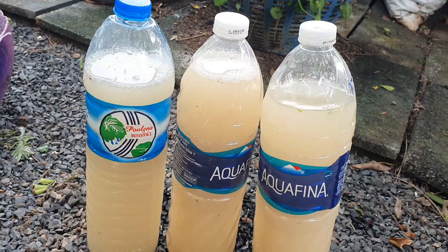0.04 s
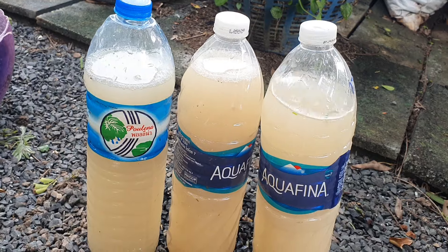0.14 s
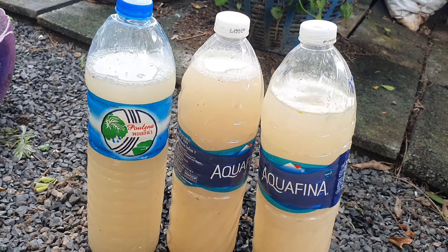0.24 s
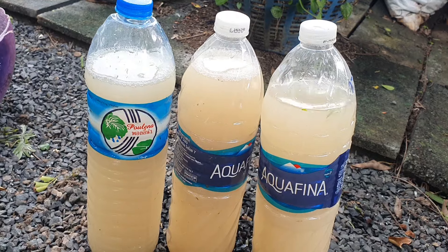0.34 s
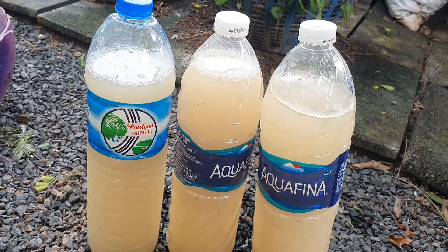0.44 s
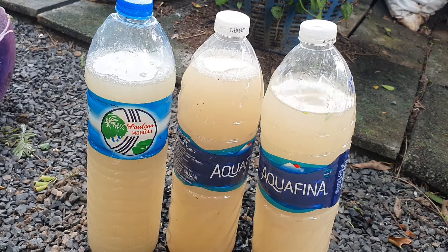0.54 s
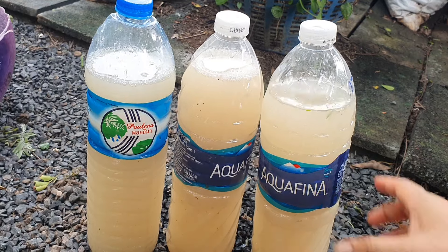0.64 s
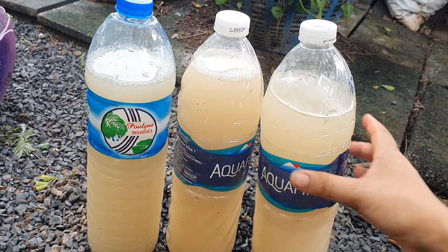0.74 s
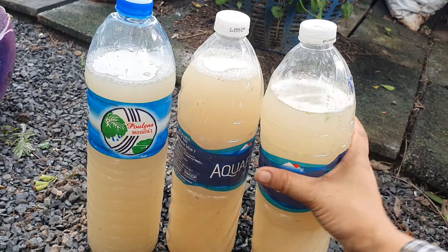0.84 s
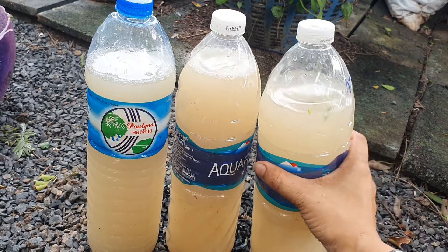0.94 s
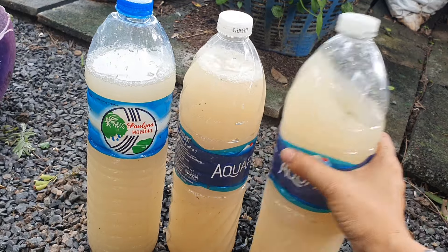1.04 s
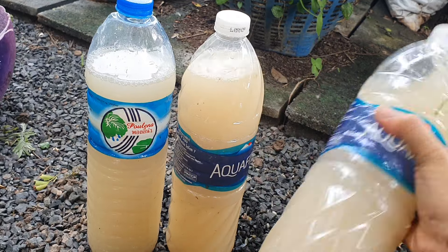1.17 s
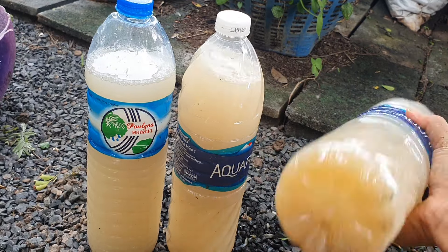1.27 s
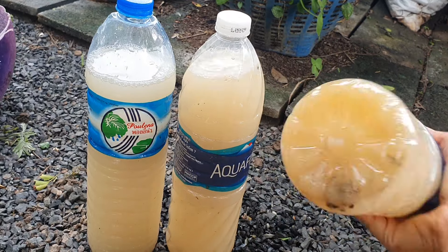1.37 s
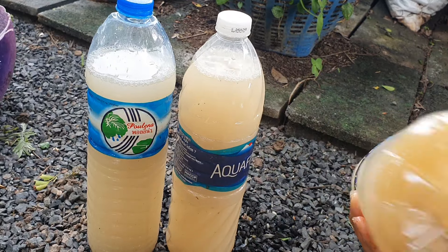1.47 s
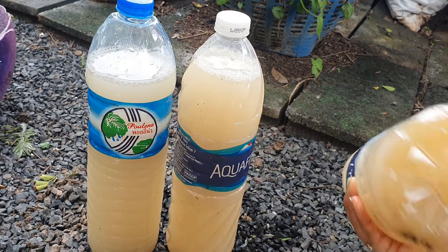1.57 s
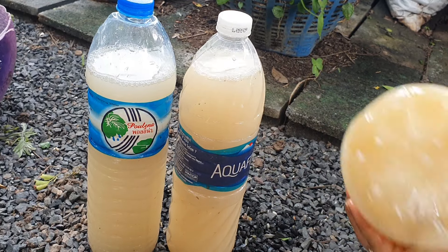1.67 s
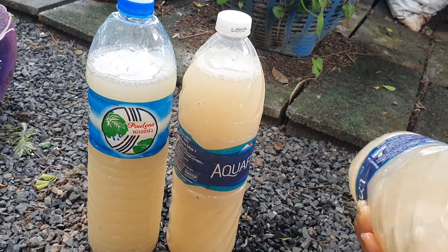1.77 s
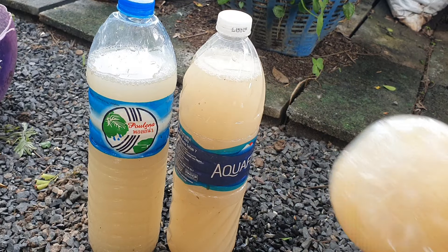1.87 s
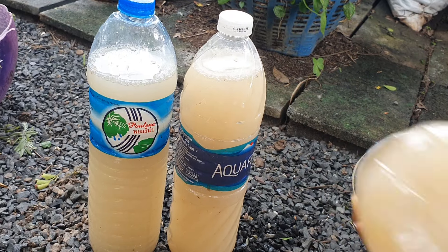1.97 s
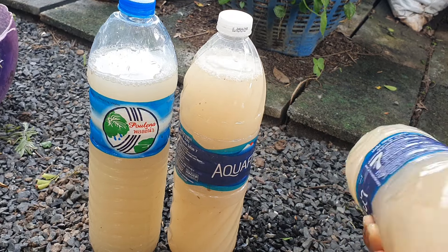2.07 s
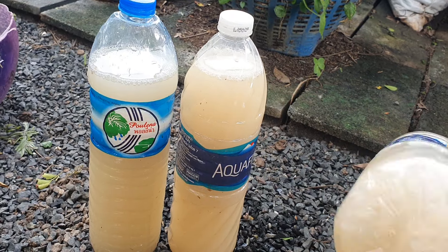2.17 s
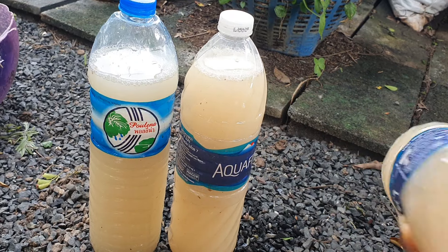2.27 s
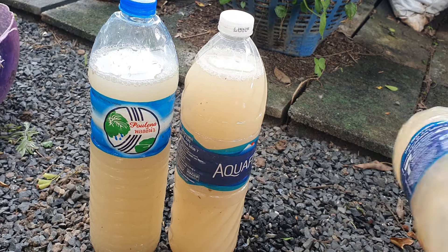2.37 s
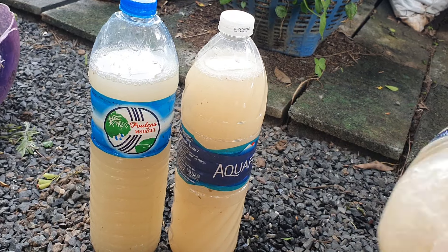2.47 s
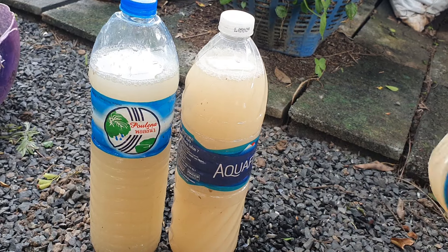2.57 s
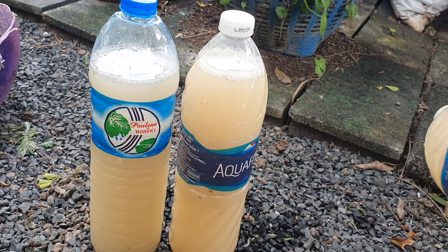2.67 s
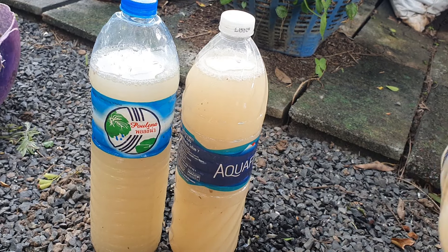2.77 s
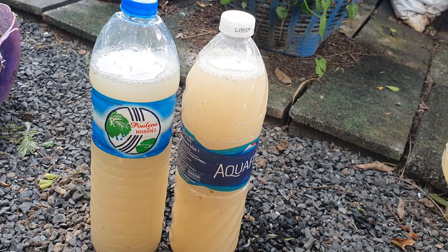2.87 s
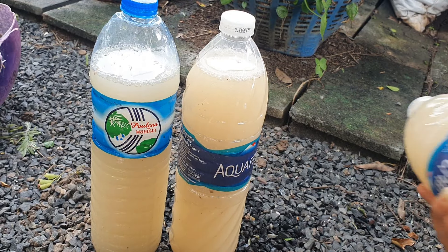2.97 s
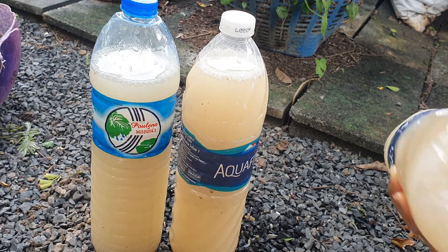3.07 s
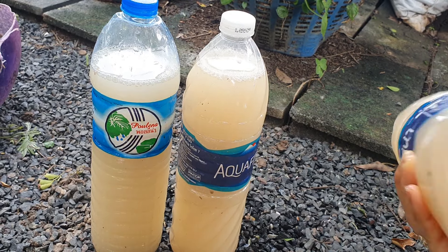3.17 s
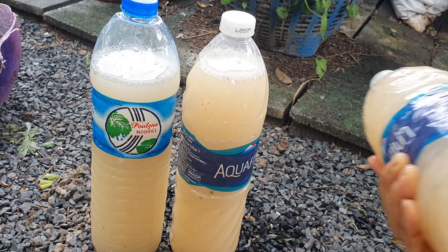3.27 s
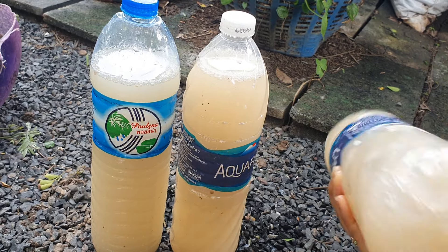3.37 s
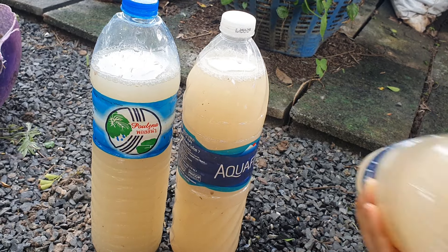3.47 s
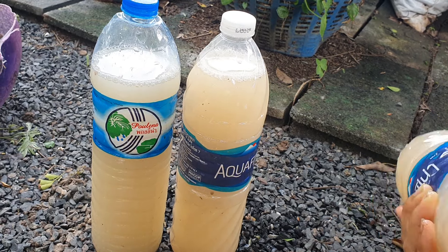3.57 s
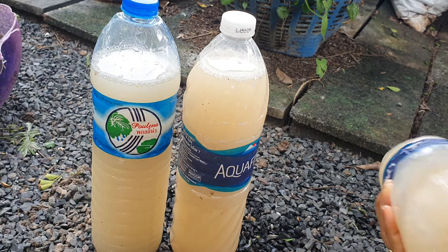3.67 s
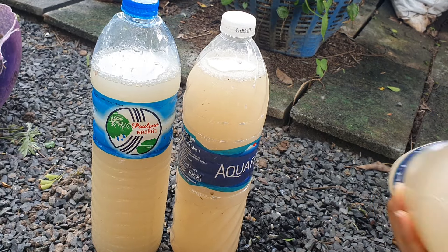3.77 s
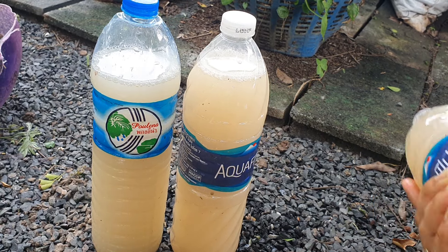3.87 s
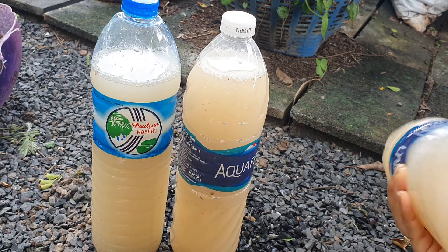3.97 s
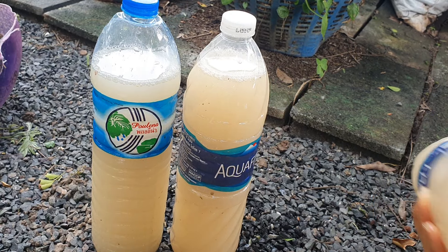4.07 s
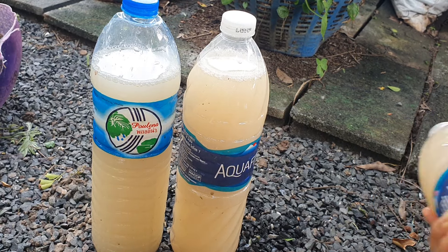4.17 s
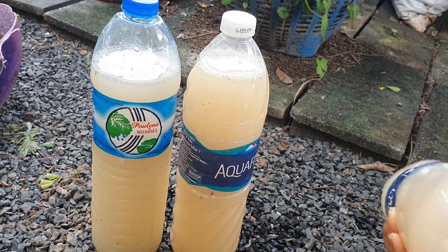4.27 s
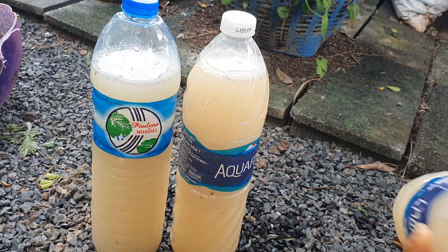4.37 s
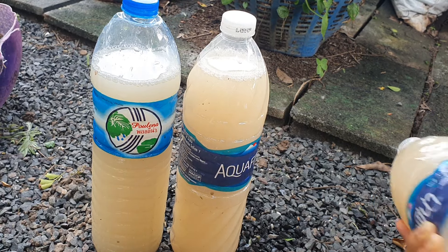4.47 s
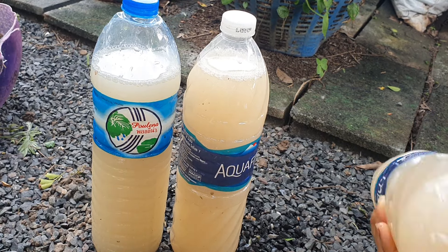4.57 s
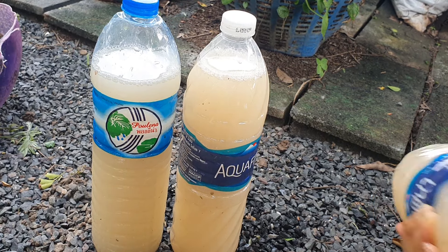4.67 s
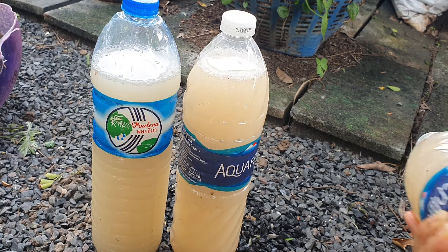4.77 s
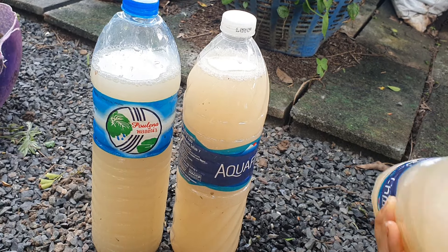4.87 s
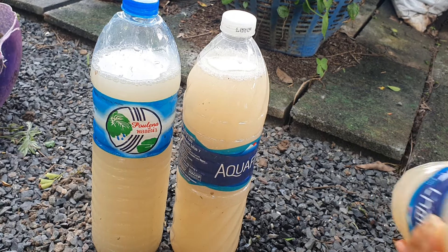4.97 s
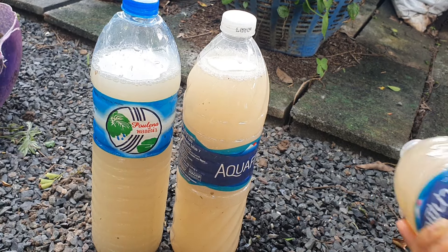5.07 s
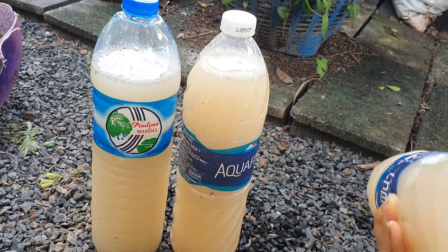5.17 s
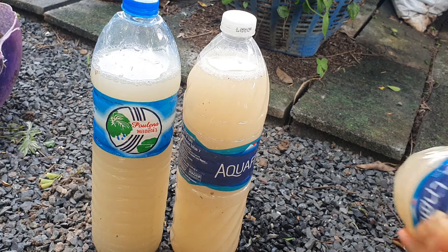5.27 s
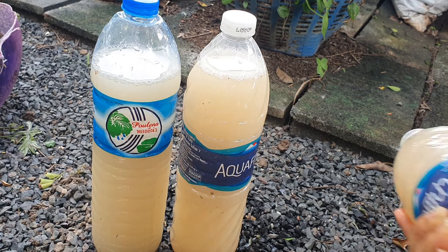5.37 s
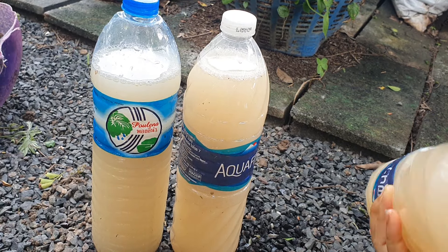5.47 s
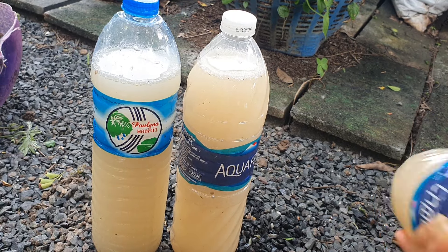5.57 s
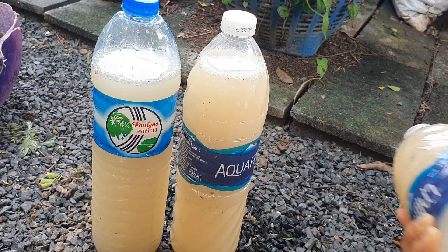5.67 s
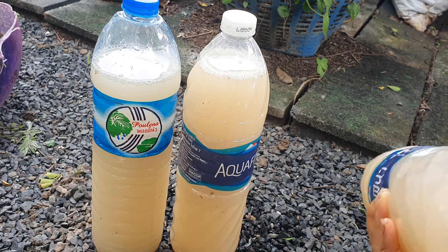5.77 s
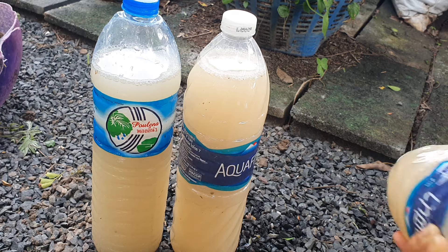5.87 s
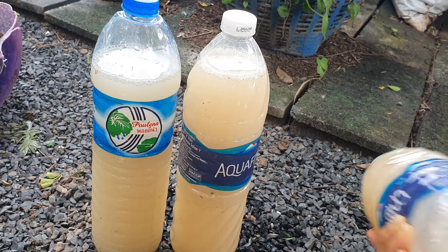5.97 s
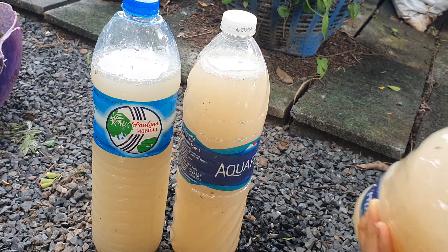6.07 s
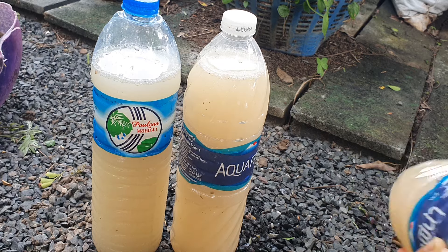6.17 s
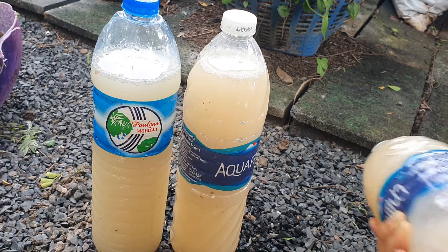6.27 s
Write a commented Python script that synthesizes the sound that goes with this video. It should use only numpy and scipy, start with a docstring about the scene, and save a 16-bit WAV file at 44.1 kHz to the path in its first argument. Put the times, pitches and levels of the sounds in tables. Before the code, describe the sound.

A plastic bottle crackles as it is grabbed, then water sloshes hard and fast inside it, with wind rumbling on the microphone.

```python
"""Water sloshes in a plastic bottle, picked up outdoors and shaken hard about three times a second.
Each shake throws the water to one end and back: bubbles gurgle, spray swishes and sharp slaps ring
the shell. The thin wall snaps as it buckles, loudest when the fingers take hold and rub over it.
Underneath, gusts of air buffet both microphone ports over a faint hiss."""
import sys
import numpy as np
from scipy import signal
from scipy.fft import rfft, irfft, next_fast_len
from scipy.io import wavfile
from scipy.ndimage import map_coordinates

SR = 44100
rng = np.random.default_rng(int(sys.argv[2]) if len(sys.argv) > 2 else 0)


def generate_wav(sig):
    """Save sig (samples, or channels by samples) to the path in sys.argv[1] as 16-bit PCM at SR."""
    pcm = np.round(np.clip(np.atleast_2d(sig).T, -1, 1) * 32767).astype(np.int16)
    wavfile.write(sys.argv[1], SR, pcm)


N = 278712

# Cue levels are relative: each layer sets its own gain.
# tone of the outdoor air: f/Hz, level/dB
HISS_EQ = [(100, 15.5), (400, 6.5), (700, 2.5), (1500, -4), (2700, -2.5), (3200, 1), (3700, -2),
           (6300, -1.5), (7700, -10.5), (14000, -10), (16000, -39)]
# tone of wind on a port: f/Hz, level/dB
RUMBLE_EQ = [(15, -38), (28, -11.5), (48, 1), (75, 2), (105, -3.5), (160, -10), (250, -23.5), (400, -44),
             (900, -61.5)]
# breeze on both ports: t/s, level/dB
BREEZE = [(0, -36), (.75, -32.5), (1.4, -35.5), (2.3, -30), (2.7, -33), (5.2, -30.5), (5.95, -30),
          (6.02, -42), (6.32, -40)]
# gusts that strike one port and may shelter the other: t/s, length/s, left/dB, right/dB
GUSTS = [(3.13, 0.27, 7, -9), (3.437, 0.22, 7.5, -10), (3.617, 0.15, -4.5, -17), (3.84, 0.23, -8, 7),
         (3.995, 0.16, 6.5, 3), (4.29, .14, 6, -3), (4.466, 0.12, 8, 0), (4.92, 0.21, 3.5, 5.5),
         (5.4, 0.46, 7, -1), (5.834, 0.12, -9, 9.5)]
# puffs of air fanned onto a port: t/s, level/dB, push f/Hz, left over right/dB
PUFFS = [(0.65, -26.5, 145, 12), (0.78, -22.5, 161, -20), (3.181, -12.5, 118, 24), (3.255, -11, 82, 24),
         (3.28, -19, 140, 24), (3.308, -9, 122, 31), (3.321, -8, 94, 30), (4.364, -20, 118, 20),
         (4.514, -16.5, 147, 15), (4.53, -20.5, 162, 8), (5.005, -16.5, 163, -21), (5.487, -12.5, 169, 26),
         (5.501, -18, 158, 22), (5.624, -11.5, 151, 26), (5.662, -12.5, 150, 24), (5.731, -8.5, 182, 31),
         (5.755, -17, 163, 24), (5.822, -15, 130, 26), (5.928, -20, 131, -3)]
# tonal tilt between the ports: f/Hz, left over right/dB
PORT_BALANCE = [(200, 1.5), (600, -1.5), (1300, 0), (3000, -3.5), (5600, -5.5), (6900, -1), (7800, 4),
                (10000, 2.5), (13000, 4.5), (16000, 5)]
# decay of the nearby reflections: f/Hz, t60/s
GROUND_DECAY = [(200, 0.062), (2000, 0.034), (10000, 0.0061)]
# tone of all reflections: f/Hz, level/dB
SCATTER_EQ = [(200, -13.5), (600, -10.5), (1500, -4.5), (4000, -1.5), (10000, 4)]
# fingers sliding on the wall: t/s, length/s, level/dB
RUBS = [(0.896, 0.18, -51), (1.18, 0.17, -48)]
# dents buckling in the wall: t/s, level/dB, f/Hz
DENTS = [(1.051, -3, 3820), (1.056, 0, 3430), (1.058, -9, 1700), (1.0975, -11.5, 6450),
         (1.106, -16.5, 4370), (1.108, -18, 1810), (1.2504, -21, 9500), (1.273, -29, 5530),
         (1.279, -22, 5730), (1.34, -24.5, 5940), (1.3564, -16, 1650), (1.3772, -12, 1260),
         (1.378, -9.5, 5800), (1.3942, -3, 1580), (1.415, -14, 1887), (1.4189, -14.5, 1140),
         (1.5116, -19, 5840), (1.98, -13.5, 2830), (2.663, -23, 5100), (2.876, -17.5, 3800),
         (2.916, -16, 3830), (2.96, -16.5, 5370), (3.004, -24, 8700), (3.276, -23.5, 3730),
         (3.8575, -12.5, 3800), (3.968, -20.5, 5100), (4.2105, -16.5, 6900), (4.419, -32, 3450),
         (5.291, -16, 4240), (5.551, -22.5, 4500), (5.6225, -16.5, 7900), (5.651, -18, 3830),
         (5.678, -14, 1900), (6.004, -21, 3100), (6.146, -21.5, 7960)]
# tone of the thin plastic: f/Hz, level/dB
PLASTIC_EQ = [(100, -21), (400, 7), (1200, 3), (3500, 3), (6300, 7), (7800, -3.5), (14000, -10.5),
              (16000, -30)]
# bright tick at the tip of a crease: f/Hz, level/dB
TICK_EQ = [(1000, -46), (7000, -8), (10000, 3.5), (14000, 2.5), (16000, -6)]
# resonances of the shell and its air space: f/Hz, width/Hz, level/dB
SHELL_MODES = [(500, 160, -20), (970, 120, -13.5), (1680, 66, -7), (1990, 110, -1), (2360, 330, -8),
               (3190, 340, -5), (4420, 140, -8), (5260, 210, -36)]
# short low rings of the bottle's body and of air pockets in the water: t/s, level/dB, starting f/Hz
LOW_RINGS = [(.269, -45, 900), (1.06, -25, 195), (1.112, -25.5, 510), (1.368, -14.5, 252),
             (1.649, -28, 760), (2.396, -24, 517), (2.548, -17, 193), (2.795, -27, 1090),
             (2.835, -23.5, 547), (3.011, -26.5, 990), (3.331, -24, 653), (3.356, -29, 914),
             (3.516, -29, 820), (3.548, -29, 1360), (3.63, -26.5, 340), (4.039, -29, 670), (4.52, -34, 570),
             (5.362, -29.5, 1610), (5.424, -21.5, 453), (5.913, -26.5, 1570), (6.004, -24, 443),
             (6.119, -26.5, 1076), (6.285, -26, 450)]
# hard slaps of water on the wall: t/s, level/dB, thump trim/dB
SLAPS = [(1.587, -8.5, -18), (1.647, -28.5, 3.5), (1.832, -21.5, -1), (1.977, -24.5, 2), (2.264, -9.5, -11),
         (2.297, -8, -16.5), (2.412, -22, -1), (2.545, -5.5, -12), (2.83, -3, -16.5), (2.957, -19.5, -6),
         (3.276, -22.5, -1.5), (3.331, -21.5, -5), (3.469, -15.5, -5.5), (3.511, -28.5, 8),
         (3.632, -20, -3), (3.857, -16, -3), (3.968, -10, -12.5), (4.208, -13, -15), (4.419, -11.5, -20.5),
         (4.647, -21, -17), (4.728, -9.5, -30), (4.946, -12.5, -5), (5.014, -9, -36), (5.103, -23, 0),
         (5.141, -8, -14), (5.261, -18.5, -5.5), (5.291, -9, -37), (5.424, -14.5, -5), (5.552, -8, -14),
         (5.675, -25, 0), (6.005, -14, -10.5), (6.17, -14, -25), (6.281, -27, 0)]
# dark body of the water: f/Hz, level/dB
GURGLE_EQ = [(120, -5.5), (220, 3.5), (330, -3.5), (520, 0.5), (800, -2), (1300, 1), (2000, -9),
             (4000, -33), (8000, -54)]
# bright top of the water: f/Hz, level/dB
SPRAY_EQ = [(400, -23), (1000, -7.5), (2000, -0.5), (3400, 1), (4600, -2.5), (6200, -1.5), (7000, -8.5),
            (7700, -19), (10000, -14.5), (14000, -18), (16000, -18)]
# shakes, a throw out and back: t/s, out length/s, out level/dB, back after/s, back level/dB, spray trim/dB
SHAKES = [(1.389, 0.047, -35, 0.19, -46, 3), (1.653, 0.12, -35.5, 0.13, -31, 1),
          (1.943, 0.077, -32.5, 0.14, -34.5, -1), (2.223, 0.073, -26.5, 0.15, -28, -2.5),
          (2.504, 0.11, -29, 0.13, -33, 1), (2.799, 0.12, -32.5, 0.17, -34, 0),
          (3.09, 0.08, -30, 0.2, -29, -5.5), (3.435, 0.062, -30.5, 0.14, -29, 0.5),
          (3.683, 0.14, -37, 0.19, -34, 1.5), (4.049, 0.13, -34.5, 0.15, -33.5, 1),
          (4.328, 0.11, -31, 0.15, -33, -1), (4.625, .14, -33, 0.16, -33, 2),
          (4.933, 0.078, -32, 0.12, -30, 2.5), (5.213, 0.11, -33, 0.14, -28, 2),
          (5.516, 0.13, -37, 0.13, -34, 4.5), (5.813, 0.1, -33, 0.12, -32.5, 1.5),
          (6.088, 0.15, -37, 0.13, -32, -1.5)]

GRIP_ENDS_S = 1.46  # earlier dents belong to the grip and ring the shell harder
DENT_T60, DENT_HZ, DENT_SLOPE = 0.012, 3500, 0.93  # rattle time at this pitch; higher dents die sooner
LOW_RING_T60 = 0.021
THROW_RISE_S, BACK_RISE_S, BACK_LENGTH_S = 0.024, 0.051, 0.076  # the water comes back more gently
SAG_DB, DRAIN_T60 = 3.5, 0.18
SWIRL_DB, SWIRL_T60 = -18.5, 0.067  # swirl between the two throws, relative to the first
CHURN_DB, CHURN_FALL_DB_PER_S = -40, 0.5
LULL_S, LULL_LEAD_S, LULL_DB_PER_S = 0.085, 0.072, -1.2
CLIP_LEVEL, TOP_HZ = 0.88, 15900


def amp(db):
    """Decibels to gain."""
    return 10 ** (np.asarray(db) / 20)


def unit(x):
    """Scale to rms 1."""
    return x / np.sqrt(np.mean(x ** 2) + 1e-20)


def along(points, hz):
    """Read (f/Hz, value) points on a log frequency axis."""
    f, values = np.transpose(points)
    return np.interp(np.log(hz + 1), np.log(f + 1), values)


def wobble(rate):
    """Smooth random modulation, rate knots a second."""
    return map_coordinates(rng.standard_normal(int(N * rate / SR) + 4), [np.arange(N) * rate / SR])


def fade(t, t60):
    """Exponential decay, 60 dB down at t60."""
    return np.exp(-np.log(1000) * t / t60)


def add(track, s, x):
    """Mix x into the track at s seconds."""
    part = track[max(round(s * SR), 0):][:len(x)]
    part += x[:len(part)]


def filtered(x, response):
    """Filter x by a complex response of frequency."""
    size = 2 * next_fast_len(N // 2 + 8192)
    return irfft(rfft(x, size) * response(np.fft.rfftfreq(size, 1 / SR)), size)[..., :N]


def eq(x, points):
    """Minimum-phase EQ through (f/Hz, level/dB) points, so attacks stay sharp."""
    def response(hz):
        cepstrum = irfft(np.log(amp(along(points, hz))))
        cepstrum[1:len(hz) - 1] *= 2
        cepstrum[len(hz):] = 0
        return np.exp(rfft(cepstrum))
    return filtered(x, response)


def placed(x, lag_ms, pan_db):
    """Place x in stereo: the left port hears it lag_ms later and pan_db louder than the right."""
    side = np.array([[-1], [1]])
    return amp(-side * pan_db / 2) * filtered(x, lambda f: np.exp(1j * np.pi * f * side * lag_ms / 1000))


def hiss():
    """A faint, steady bed of outdoor air, duller on the right."""
    left, right = unit(eq(rng.standard_normal((2, N)), HISS_EQ))
    return amp(-49.5) * np.array([left, eq(right, [(6500, 0), (7800, -20)])])


def wind():
    """Air buffets each port on its own: a fluttering rumble that rides the breeze and its gusts."""
    breeze_db = np.interp(np.arange(N) / SR, *np.transpose(BREEZE))
    gust_db = np.zeros((2, N))
    for s, length, left_db, right_db in GUSTS:
        swell = signal.windows.tukey(round(length * SR), 0.76)
        add(gust_db[0], s, left_db * swell)
        add(gust_db[1], s, right_db * swell)
    rumble = eq(rng.standard_normal((2, N)), RUMBLE_EQ)
    flutter = amp(3.26 * np.array([wobble(16), wobble(17)]))
    return unit(rumble * flutter) * amp(breeze_db + gust_db + 1.5)


def puffs():
    """Fanned air pops on a port: a sharp push and a damped swing an octave below."""
    ports, t = np.zeros((2, N)), np.arange(SR // 8) / SR
    for s, db, hz, pan_db in PUFFS:
        push = np.sin(2 * np.pi * hz * t) * fade(t, 0.02)
        swing = np.sin(np.pi * hz * t) * fade(t, 0.046)
        attack = 1 - np.exp(-t / 0.0013)
        puff = amp(db + 4) * attack * (1.45 * push + 0.74 * swing)
        add(ports[0], s, amp(min(pan_db, 0)) * puff)
        add(ports[1], s, amp(min(-pan_db, 0)) * puff)
    return eq(ports, [(15, -25), (55, 5), (300, 3), (700, 0.5)])


def reflections(send, yard_db, yard_t60):
    """The ground answers at once, the yard faintly after; the pattern shifts as the bottle moves."""
    hop = SR // 36  # each block gets a fresh noise tail
    scatter = np.zeros((2, N))
    for start in range(0, N, hop):
        hz, t, noise = signal.stft(rng.standard_normal((2, SR // 7)), SR, nperseg=128)
        decay = fade(t, along(GROUND_DECAY, hz)[:, None]) + amp(yard_db) * fade(t, yard_t60)
        tails = signal.istft(noise * decay, SR, nperseg=128)[1]
        for port, tail in zip(scatter, tails):
            add(port, start / SR, signal.fftconvolve(send[start:start + hop], tail / np.linalg.norm(tail)))
    return eq(scatter, SCATTER_EQ)


def shell(x, ring):
    """Sound passes the wall directly and through its resonances; ring sets their share."""
    def modes(f):
        return sum(amp(db) * 1j * f * width / (hz * hz - f * f + 1j * f * width)
                   for hz, width, db in SHELL_MODES)
    return filtered(x, lambda f: (1 + ring * modes(f)) / (1 + ring / 2))


def rubs():
    """Skin slips over the plastic in faint, grainy swells."""
    swells = np.zeros(N)
    for s, length, db in RUBS:
        add(swells, s, amp(db) * np.hanning(round(length * SR)))
    friction = eq(rng.standard_normal(N), PLASTIC_EQ)
    return swells * unit(friction * amp(5 * wobble(130)))


def snaps(dents, ring):
    """Each dent flips with a crack, a ping and a rattle; small, high dents tick more brightly."""
    wall, tips, t = np.zeros(N), np.zeros(N), np.arange(SR // 10) / SR
    for s, db, hz in dents:
        t60 = DENT_T60 * (DENT_HZ / hz) ** DENT_SLOPE
        band = signal.butter(1, [hz / 1.9, hz * 0.83], "band", fs=SR)
        rattle = unit(signal.lfilter(*band, rng.standard_normal(len(t)))) * fade(t, t60)
        ping = np.sin(2 * np.pi * hz * t) * fade(t, 0.5 * t60)
        crack = rng.standard_normal(len(t)) * fade(t, 0.0019)
        add(wall, s, amp(db) * (0.38 * rattle + 0.84 * ping + 0.94 * crack))
        add(tips, s, amp(db - 6.5) * hz / 6000 * crack)
    return shell(eq(wall, PLASTIC_EQ), ring) + eq(tips, TICK_EQ)


def low_rings():
    """Short low rings: the bottle's body after the first loud snap, then air pockets glugging."""
    track, t = np.zeros(N), np.arange(SR // 8) / SR
    envelope = (1 - np.exp(-t / 0.0015)) * fade(t, LOW_RING_T60)
    for s, db, hz in LOW_RINGS:
        rising_tone = np.sin(2 * np.pi * hz * t * (1 + 0.038 * t / LOW_RING_T60))
        add(track, s, amp(db + 9.5) * envelope * rising_tone)
    return track


def slaps():
    """A sheet of water hits the wall: a short splash layered with a duller thump."""
    splash, thump, t = np.zeros(N), np.zeros(N), np.arange(SR // 10) / SR
    for s, db, thump_db in SLAPS:
        add(splash, s, amp(db - 9.5) * fade(t, 0.043) * rng.standard_normal(len(t)))
        add(thump, s, amp(db + thump_db + 12.5) * fade(t, 0.045) * rng.standard_normal(len(t)))
    return shell(eq(splash, SPRAY_EQ) + eq(thump, GURGLE_EQ), ring=0.65)


def bubbles(per_s, low_hz, high_hz, cycles, spread_db, glide, samples):
    """A steady swarm of bubbles at rms 1, each a damped, rising tone; a few stand out."""
    when, pitch, life, rank = rng.random((int(per_s * N / SR), 4)).T[:, :, None]
    hz = low_hz * (high_hz / low_hz) ** pitch
    t60 = np.minimum(cycles * 2 ** (2 * life - 1) / hz, samples / SR)
    t = np.arange(samples) / SR
    gain = amp(-spread_db * np.log(rank + 0.0057)) * np.sqrt(hz)
    tones = gain * fade(t, t60) * np.sin(2 * np.pi * hz * t * (1 + glide * t / t60 / 2))
    positions = (when * N).astype(int) + np.arange(samples)
    return unit(np.bincount(positions.ravel(), tones.ravel(), N)[:N])


def foam(db):
    """Foam fizzes as white noise under the bubbles."""
    return amp(db) * rng.standard_normal(N)


def churning():
    """Gain of the water that keeps stirring once the shaking begins, slowly thinning out."""
    shaken_s = np.arange(N) / SR - SHAKES[0][0]
    return amp(CHURN_DB - CHURN_FALL_DB_PER_S * shaken_s) * (shaken_s > 0)


def lulls():
    """Gain that ducks as the water lies still at one end before a shake, deeper each time."""
    dip_db = np.zeros(N)
    window = signal.windows.tukey(round(LULL_S * SR), 0.5)
    for s, *_ in SHAKES:
        depth_db = LULL_DB_PER_S * (s - SHAKES[0][0])
        add(dip_db, s - LULL_LEAD_S, depth_db * window)
    return amp(dip_db)


def throw(t, rise_s, length_s, t60):
    """Power of one throw: it rises, sags while water piles up, then drains away."""
    attack = np.minimum(t / rise_s, 1)
    sag = amp(-SAG_DB * np.minimum(t / length_s, 1))
    drain = fade(np.maximum(t - length_s, 0), t60)
    return (attack * sag * drain) ** 2


def shakes():
    """Power envelopes for gurgle and spray: the water flies out, swirls and comes back."""
    gurgle, spray, t = np.zeros(N), np.zeros(N), np.arange(SR // 2) / SR
    for s, length, out_db, back_s, back_db, spray_db in SHAKES:
        out = amp(out_db) ** 2 * throw(t, THROW_RISE_S, length, DRAIN_T60)
        swirl = amp(out_db + SWIRL_DB) ** 2 * throw(t, THROW_RISE_S, back_s + BACK_LENGTH_S, SWIRL_T60)
        back = amp(back_db) ** 2 * throw(t, BACK_RISE_S, BACK_LENGTH_S, DRAIN_T60)
        for start, power in (s, out + swirl), (s + back_s, back):
            add(gurgle, start, power)
            add(spray, start, power * amp(spray_db) ** 2)
    return gurgle, spray


def water():
    """Big bubbles gurgle; tiny ones and foam swish as spray at both ends. All come in clumps."""
    gurgle_power, spray_power = shakes()
    churn = churning()
    clumps_db = 1.98 * wobble(140)
    big = bubbles(per_s=1300, low_hz=220.7, high_hz=2500, cycles=10, spread_db=1, glide=0.1, samples=1400)
    big += foam(-0.5)
    pockets = bubbles(per_s=70, low_hz=339, high_hz=1253, cycles=21.4,
                      spread_db=2.5, glide=0.22, samples=2600)  # fewer, rounder, longer rings
    gurgle = shell(eq(big + amp(-4) * pockets, GURGLE_EQ), ring=0.45)
    gurgle = unit(gurgle * amp(clumps_db + 1.64 * wobble(50)))
    gurgle *= amp(-1.5) * np.sqrt(gurgle_power + (amp(1.5) * churn) ** 2)
    ends = []
    for _ in range(2):
        tiny = bubbles(per_s=3800, low_hz=1340, high_hz=9200, cycles=5,
                       spread_db=5, glide=0.09, samples=160)
        spray = eq(tiny + foam(0), SPRAY_EQ)
        spray = unit(spray * amp(clumps_db + 3.5 * wobble(40) + 2.67 * wobble(400)))
        ends.append(spray * amp(-4) * np.sqrt(spray_power + churn ** 2))
    return np.array([gurgle, *ends]) * lulls()


def scene():
    """The bottle is gripped near centre and shaken off to the right, its two ends spread apart."""
    grip = snaps([dent for dent in DENTS if dent[0] < GRIP_ENDS_S], ring=1.75) + rubs()
    gurgle, near_end, far_end = water()
    body = gurgle + slaps() + low_rings()
    body += snaps([dent for dent in DENTS if dent[0] >= GRIP_ENDS_S], ring=0.96)
    send = amp(-2) * (grip + body) + amp(-7) * (near_end + far_end)
    spray = placed(near_end, lag_ms=0.17, pan_db=-8) + placed(far_end, lag_ms=0.23, pan_db=8)
    bottle = placed(grip, lag_ms=0.07, pan_db=2) + amp(-1.5) * placed(body, lag_ms=0.205, pan_db=-2)
    bottle += amp(-1) * spray + reflections(send, yard_db=-19, yard_t60=0.18)
    bottle = filtered(bottle, lambda f: amp(along(PORT_BALANCE, f) * np.array([[1], [-1]]) / 2))
    return bottle + wind() + puffs() + hiss()


def record(dry):
    """Master chain: hard-clip the highest peaks, then cut everything above TOP_HZ."""
    clipped = np.clip(dry, -CLIP_LEVEL, CLIP_LEVEL)
    return filtered(clipped, lambda hz: hz < TOP_HZ)


dry = scene()
out = record(dry)
generate_wav(out)
```